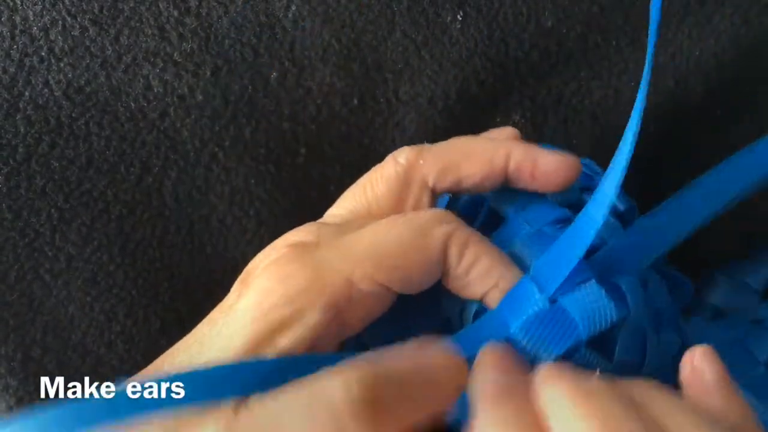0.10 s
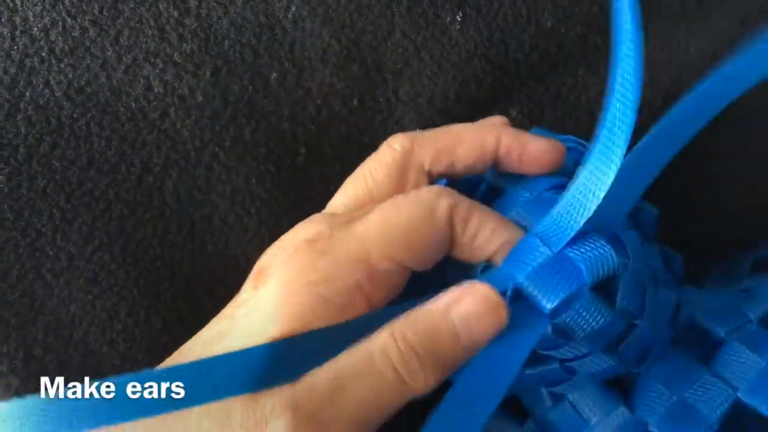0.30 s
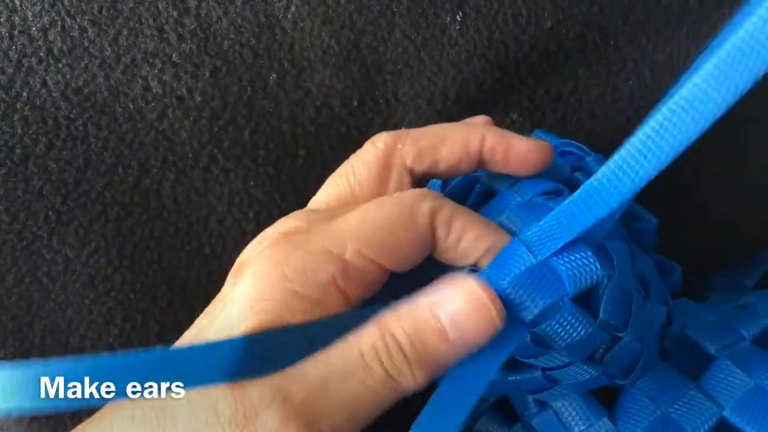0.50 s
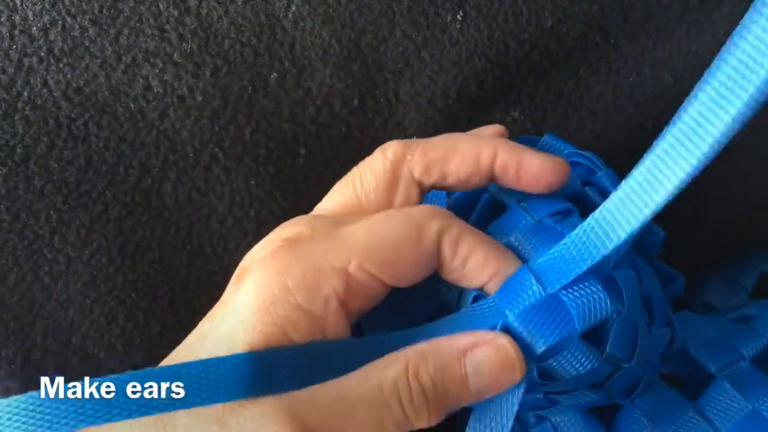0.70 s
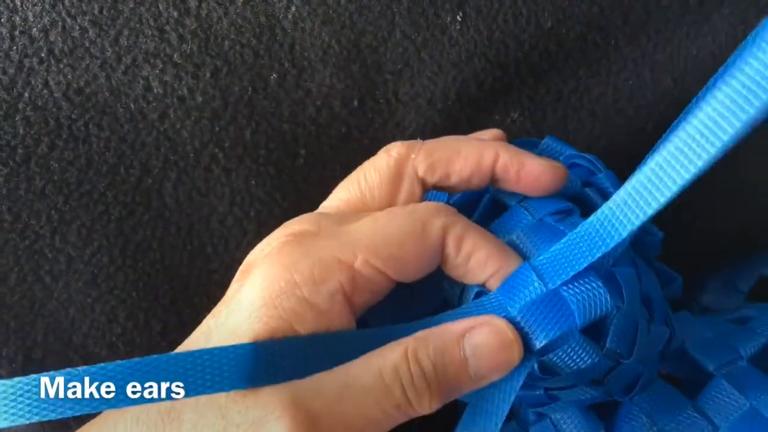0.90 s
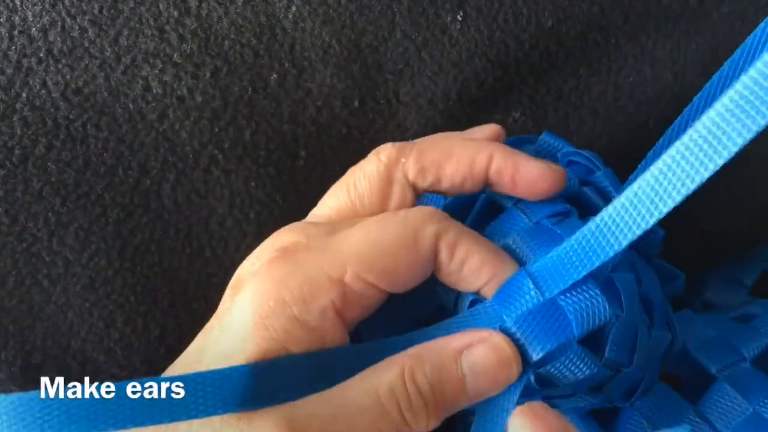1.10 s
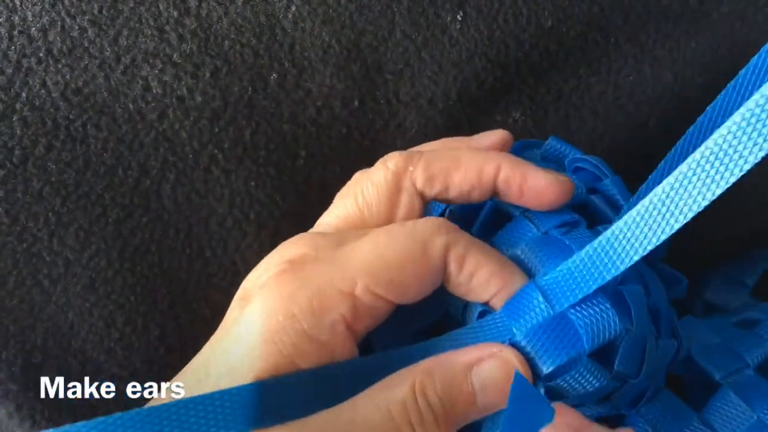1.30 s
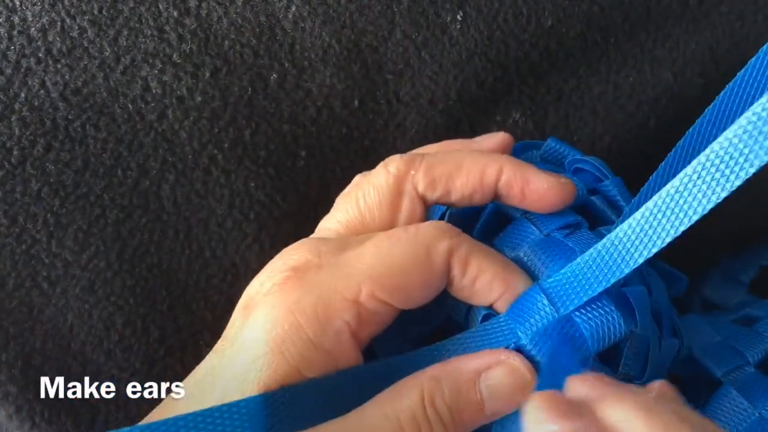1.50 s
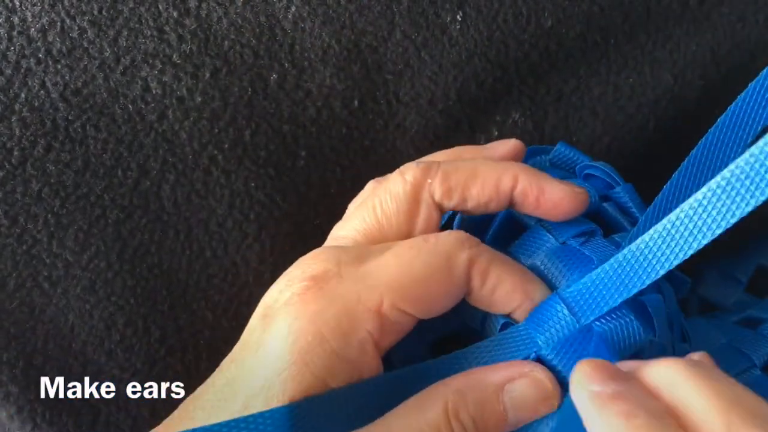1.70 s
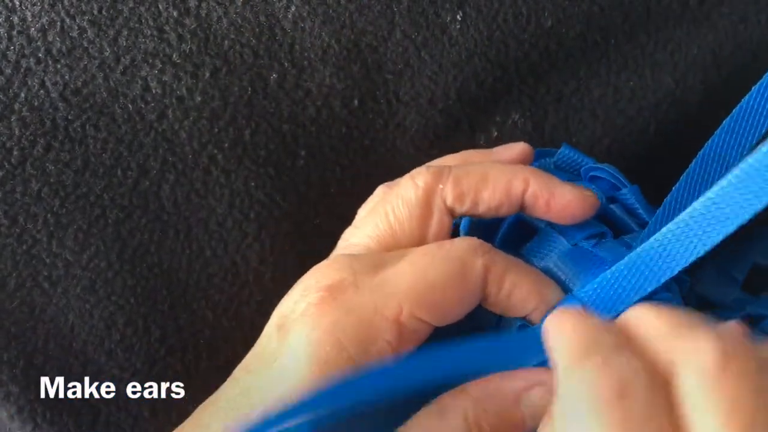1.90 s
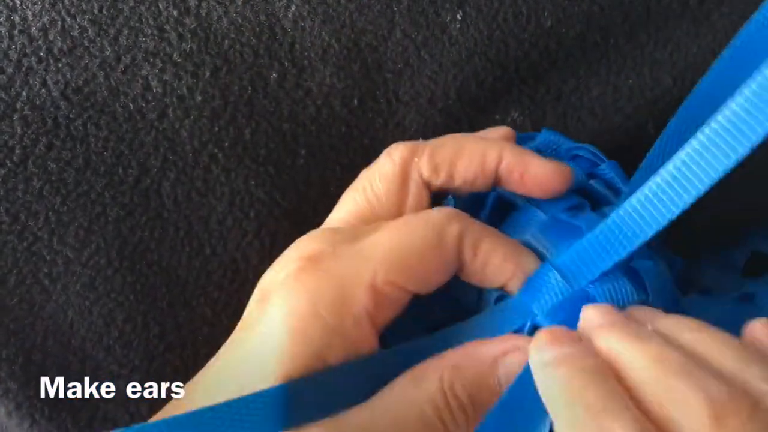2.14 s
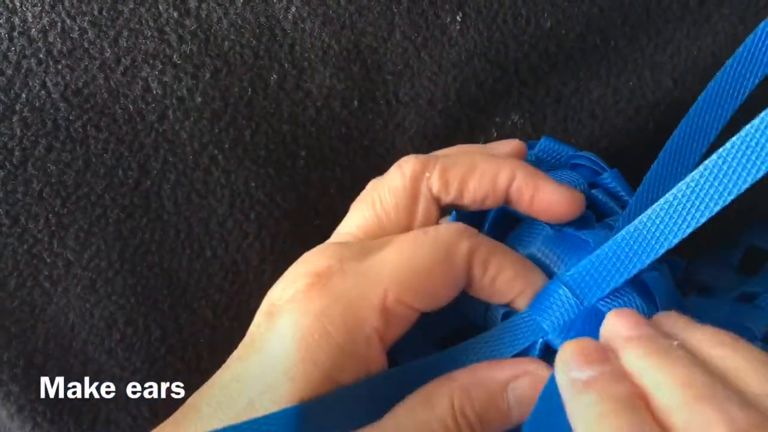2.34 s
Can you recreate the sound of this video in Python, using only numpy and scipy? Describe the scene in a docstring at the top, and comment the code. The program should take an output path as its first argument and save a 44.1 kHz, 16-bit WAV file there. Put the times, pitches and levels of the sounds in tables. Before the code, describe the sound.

A stiff ridged plastic strap is yanked through a weave with a sharp snap and rising buzzy scrape, then isolated ticks and faint crinkles thin out; close microphone in a quiet room.

```python
"""One embossed plastic strap is pulled through a weave, close to the microphone in a quiet room.
Its ridges click into the strap's resonance as a rising buzz, grit scrapes and the weave sings briefly.
Before, during and after the pull, stiff bands snap and tick: ticks in brief noise ring their modes.
Dense random crinkles make the faint rustle of fingers and bands, and low sagging tones the hand's bumps.
Behind lie a short diffuse echo of the pull and snaps, and shaped noise as room rumble and hiss."""
import sys
import numpy as np
from scipy import signal
from scipy.io import wavfile
from scipy.ndimage import uniform_filter1d

SR = 44100
rng = np.random.default_rng(int(sys.argv[2]) if len(sys.argv) > 2 else 0)


def to_linear_factor(level_db):
    """Convert decibel levels (scalar or array-like) to linear amplitude factors."""
    exponent = np.asarray(level_db, float) / 20
    return 10 ** exponent


def unload_wav(signal):
    """Save mono or channel-first audio to the path in sys.argv[1] as 16-bit WAV at rate SR, clipped to [-1, 1]."""
    wavfile.write(
        sys.argv[1],
        SR,
        np.round(np.clip(np.atleast_2d(signal).T, -1, 1) * 32767).astype(np.int16),
    )


N = 105840

# ringing modes of the stiff plastic band: pitch_hz, level_db (relative, before each snap's tilt), t60_s
BAND_MODES = [(1102, -3, 0.013), (2050, 5, 0.0027), (2730, 5.5, 0.0023), (4125, -8, 0.0069),
              (5954, -7, 0.0075), (6575, 3, 0.0023), (7816, -2, 0.0027), (9400, 2, 0.0032),
              (11770, 3, 0.0025), (13440, -2.5, 0.0072), (13440, -3, .003), (15400, -5.5, 0.0033)]


def unit_rms(x):
    """Scales to rms 1."""
    return x / np.sqrt(np.mean(x ** 2) + 1e-20)


def spectrum_db(points, hz):
    """Reads a spectrum table, interpolating on a log-frequency axis."""
    table_hz, table_db = np.transpose(points)
    return np.interp(np.log(hz + 1), np.log(table_hz + 1), table_db)


def curve(table, column):
    """One column of a time table, per sample."""
    rows = np.array(table)
    return np.interp(np.arange(N) / SR, rows[:, 0], rows[:, column])


def within(table, fade_s=0.0033):
    """1 during the span of a table, fading to 0 at its ends."""
    t = np.arange(N) / SR
    return np.clip(np.minimum(t - table[0][0], table[-1][0] - t) / fade_s, 0, 1)


def swell(start_s, length_s, sharp=0.3):
    """A rounded hump in time, per sample; a higher sharp makes it narrower."""
    u = np.clip((np.arange(N) / SR - start_s) / length_s, 0, 1)
    return np.abs(np.sin(np.pi * u)) ** sharp * (u < 1)


def coloured(x, points):
    """Causal minimum-phase filter with the given spectrum."""
    hz = abs(np.fft.fftfreq(4096, 1 / SR))
    log_gain = np.log(to_linear_factor(np.maximum(spectrum_db(points, hz), -100)))
    phase = -signal.hilbert(log_gain).imag
    taps = np.fft.ifft(np.exp(log_gain + 1j * phase)).real[:2048]
    return signal.oaconvolve(x, taps)[:N]


def resonate(x, hz, width_hz):
    """A resonance of gain 1 that follows the curve hz: shift down, smooth, shift back up."""
    turn = np.exp(2j * np.pi * np.cumsum(hz) / SR)
    r = np.exp(-np.pi * width_hz / SR)
    return 2 * (turn * signal.lfilter([1 - r], [1, -r], x / turn)).real


def grains(per_s, spread_db):
    """Dense random clicks of random size and sign, a few of them large."""
    draw = rng.random((N, 3))
    size = to_linear_factor(spread_db * np.minimum(-np.log(draw[:, 0] + 1e-9), 5))
    sign = np.sign(draw[:, 1] - .5)
    return unit_rms(size * sign * (draw[:, 2] < per_s / SR))


def pull():
    """Ridges click into the free strap amid scraping grit; band modes and the singing weave join in."""
    # course of the pull: time_s, level_db, ridge_clicks_db (re grit), strap_resonance_hz
    course = [(0.185, -69.5, -3, 1298), (0.241, -29.5, -11, 1343), (0.253, -35, -11, 1400),
              (0.305, -36, 1.5, 1540), (0.383, -32.5, -10.5, 1456), (0.427, -33, -7, 1780),
              (0.467, -36, -2.5, 1423), (0.505, -32, -10.5, 1700), (0.567, -47, -9.5, 1492),
              (0.577, -63, -9.5, 1486), (0.6, -55, -5.5, 1350)]
    # speed of the pull: time_s, ridge_rate_hz (before a slight random waver)
    speed = [(.2, 205.9), (.25, 220.1), (.283, 243.3), (.315, 266.1), (.345, 271.8), (.358, 243.8),
             (.39, 259.4), (.405, 288.5), (.425, 307.5), (.46, 306.7), (.487, 311.3), (.503, 264),
             (.524, 256.2), (.536, 378), (.56, 400.4)]
    # colour of the scrape: pitch_hz, relative_density_db (per Hz)
    scrape_tone = [(35, -57.5), (60, -19), (149, -13.5), (244, -10.5), (380, -11), (607, -0.5), (682, -5.5),
                   (991, -9.5), (1250, 0), (3500, -8.5), (6580, -10), (9570, -11), (16000, -23)]
    ridge_jitter, ridge_size_db = 0.045, 3.5  # rms, in ridge spacings and dB
    rate_waver = .012  # rms, as a share of the ridge rate
    grit_per_s, grit_spread_db = 14000, 2.2
    strap_width_hz, strap_db, streak_db = 790, -14, -1.5  # levels re the scrape

    waver = unit_rms(uniform_filter1d(rng.standard_normal(N), 600))
    turns = np.cumsum(curve(speed, 1) * (1 + rate_waver * waver)) / SR  # ridges passed so far
    slips = turns + ridge_jitter * unit_rms(uniform_filter1d(rng.standard_normal(N), 150))
    ridges = np.diff(np.floor(np.maximum.accumulate(slips)), prepend=0)
    ridges = ridges * to_linear_factor(ridge_size_db * rng.standard_normal(N))
    clicks = unit_rms(signal.lfilter([1, 0.1, -1.8, 0.48], [1], ridges))
    drive = grains(grit_per_s, grit_spread_db) + to_linear_factor(curve(course, 2)) * clicks
    scrape = unit_rms(coloured(drive, scrape_tone))
    strap = unit_rms(resonate(scrape, curve(course, 3), strap_width_hz))
    ringing = unit_rms(streaks(scrape))
    mix = unit_rms(scrape + to_linear_factor(strap_db) * strap + to_linear_factor(streak_db) * ringing)
    return within(course) * to_linear_factor(curve(course, 1)) * mix + singing(turns)


def singing(turns):
    """The weave sings briefly on multiples of the ridge rate, each note flickering in level."""
    # sung notes: start_s, length_s, multiple_of_ridge_rate, level_db (rms, before the flicker)
    notes = [(0.268, 0.051, 1, -43), (.25, 0.087, 2, -45), (0.251, 0.066, 3, -45), (0.262, 0.045, 5, -47),
             (0.315, 0.035, 4, -46), (0.318, 0.06, 6, -40.5), (0.356, 0.05, 5, -37),
             (.352, 0.047, 3, -52.5), (0.354, .035, 8, -45), (0.367, .025, 1, -53), (0.392, 0.1, 2, -44.5),
             (0.409, 0.072, 4, -40), (0.412, 0.069, 7, -40), (0.429, 0.059, 1, -49), (0.488, 0.039, 1, -47),
             (0.527, 0.032, 1, -45)]
    flicker_db = 2.5  # rms
    out = np.zeros(N)
    wobbles = uniform_filter1d(rng.standard_normal((len(notes), N // 100 + 1)), size=4)
    for (start_s, length_s, multiple, level_db), wobble in zip(notes, wobbles):
        flicker = np.interp(np.linspace(0, 1, N), np.linspace(0, 1, len(wobble)), unit_rms(wobble))
        level = to_linear_factor(level_db + flicker_db * flicker)
        tone = np.sqrt(2) * np.sin(2 * np.pi * np.round(multiple) * turns)
        out = out + level * swell(start_s, length_s) * tone
    return out


def streaks(x):
    """Rubbing stirs each mode of the band, now more, now less."""
    flicker_db, narrow = 5.0, .6  # rms flicker; scale of the mode widths
    grips = uniform_filter1d(rng.standard_normal((len(BAND_MODES), N)), size=700)
    return sum(to_linear_factor(flicker_db * unit_rms(grip)) * resonate(x, np.full(N, hz), narrow * 2.9 / t60_s)
               for (hz, _, t60_s), grip in zip(BAND_MODES, grips))


def snaps():
    """A tick, noise swelling just before it and chatter dying away after ring slightly shifted modes."""
    # snaps of band on band: time_s, level_db (before the common trim), then tilts added to the mode
    # levels: lowest_mode_db, low_modes_db, high_modes_db
    events = [(0.075, -40.5, -37, -16, -16), (0.119, -38.5, 4, 1, -8), (0.145, -35, -18, -11.5, -25.5),
              (0.163, -47, -19, -10, -38), (0.173, -51.5, -18, -10, -13), (0.199, -37.5, -23, -22, -25.5),
              (0.213, -42, 1, -13.5, -13.5), (0.223, -38, -20, -20.5, -13), (0.226, -15, -11.5, -20.5, -13),
              (0.237, -6.5, -16, -25, -20), (0.239, -10.5, -19.5, -8, -5), (0.239, -4, -16.5, -15, -11.5),
              (0.243, -12, -14.5, -21, -17), (0.357, -34, -12, -10.5, -17), (0.383, -19, -20, -45.5, -16.5),
              (0.387, -8, -46, -14, -14.5), (0.396, -7.5, -16, -13, -8.5), (0.499, -8.5, -31, -17, -14.5),
              (0.534, -14.5, -16.5, -33.5, -25.5), (0.545, -15.5, -24.5, -20, -15),
              (0.562, -22, -9, -11.5, -18), (0.568, -26, -7, -7.5, -17), (0.637, -33, -6, -7.5, -26),
              (0.683, -14.5, -40, -13, -13), (0.747, -34.5, -20, -17.5, -22), (0.776, -39, -11, -20, -21),
              (0.781, -38, -18, -23, -27.5), (0.879, -45, -23, -0.5, -22), (0.924, -46, -16.5, -15, -20),
              (0.953, -48.5, -11.5, -16, -19.5), (1.098, -32.5, -22, -19.5, -6.5),
              (1.151, -16, -29, -20.5, -22), (1.203, -47, -29, -10, 6.5), (1.212, -18, -19, -14, -15),
              (1.223, -28, -36, -42, -32.5), (1.278, -43, -30, -18, -35), (1.557, -37.5, -14.5, -21, -19),
              (1.623, -44.5, -13.5, -28, -22), (1.633, -45.5, -9.5, -26, -14.5),
              (1.649, -36, -12, -20.5, -22.5), (1.873, -45.5, -12.5, -18, -21),
              (1.919, -36.5, -13, -30.5, -18), (2.04, -37.5, -21.5, -26.5, -20),
              (2.081, -48, -17.5, -16, -14), (2.164, -24, -33.5, -20.5, -10.5), (2.176, -39, -22, -18, -12)]
    trim_db, noise_db = -4, -26  # the noise before and after is re the tick
    before_s, chatter_s, rise_s = .002, 0.0042, .00012
    before_dull, detune = .55, .035  # smoothing pole; rms share of the mode pitch
    thin = signal.butter(2, 650, "high", fs=SR, output="sos")  # Hz

    out, t, lead = np.zeros(N + SR), np.arange(2400) / SR, 500  # lead: samples ahead of the tick
    count = len(BAND_MODES)
    draws = rng.standard_normal((len(events), 2 * count + len(t)))
    since = t - lead / SR
    shape = np.exp(-np.abs(since) / np.where(since < 0, before_s, chatter_s))
    for (time_s, level_db, lowest_db, low_db, high_db), draw in zip(events, draws):
        kick = to_linear_factor(noise_db) * draw[2 * count:] * shape
        dulled = signal.lfilter([1 - before_dull], [1, -before_dull], kick)
        kick = np.where(since < 0, dulled, kick)
        kick[lead] = 1  # the tick
        tilt = [(1400, lowest_db), (1900, low_db), (3000, low_db), (4000, -12), (7500, -12.5), (9000, high_db)]
        modes = np.zeros(len(t))
        for k, (hz, mode_db, t60_s) in enumerate(BAND_MODES):
            decay = to_linear_factor(mode_db + spectrum_db(tilt, hz) - 60 * t / t60_s)
            shifted_hz = hz * (1 + detune * draw[2 * k])
            modes += decay * np.sin(2 * np.pi * shifted_hz * t) * np.sign(draw[2 * k + 1])
        modes = signal.sosfilt(thin, modes * np.minimum(t / rise_s, 1))
        ring = signal.fftconvolve(kick, modes / abs(modes).max())[:len(t)]
        at = round(time_s * SR) - lead
        out[at:at + len(t)] += to_linear_factor(level_db + trim_db) * ring
    return out[:N]


def rustle():
    """Tiny crinkles as fingers and bands scuff the weave, stirring band modes; each leans dull or bright. Two
    short, loud bursts of this noise near 0.22 s and 0.24 s are further snaps of the bands among the others
    there."""
    # scuffs: start_s, length_s, level_db (before the tilt), brightness_db (treble up, bass down); the short #
    # loud rows at 0.219 s and 0.235 s are further band snaps among the snaps there, sounded as noise bursts
    scuffs = [(0, 0.07, -67.5, -2.5), (0.045, 0.06, -65, 2), (0.09, 0.095, -58.5, -7.5),
              (0.149, 0.048, -62, -2), (0.18, 0.052, -50, -3), (.219, 0.013, -40, -1.5),
              (0.235, .012, -29, 2.75), (0.58, 0.076, -57, -2.5), (0.651, 0.08, -54.5, -3),
              (0.702, 0.084, -67, 0), (0.758, 0.051, -59.5, -8), (0.864, 0.039, -65.5, -5.5),
              (0.784, 0.084, -74, -6), (0.849, 0.15, -69, 1.5), (0.964, .11, -82.5, -9.8),
              (1.08, 0.046, -58.5, -8.3), (1.104, 0.11, -61.5, -2.3), (1.183, 0.053, -45.5, 1.8),
              (1.222, 0.072, -72.5, 5), (1.261, 0.074, -64.5, -1.5), (1.281, 0.14, -68.5, 0.7),
              (1.561, 0.064, -67.5, 0.7), (1.609, 0.038, -66, -5.5), (1.637, 0.035, -63.5, -3),
              (1.85, 0.053, -68.5, -1.6), (1.884, 0.076, -59, -5.5), (1.934, 0.13, -70.5, -1.7),
              (2.062, 0.12, -67, -1), (2.157, 0.053, -76.5, 7.5), (2.366, 0.044, -70, 1)]
    # colour of the crinkles: pitch_hz, relative_density_db (per Hz)
    tone = [(180, -30.5), (300, -6), (801, -17), (1320, -6.5), (1580, -9.5), (2440, -9.5), (3580, -14.5),
            (4090, -11.5), (12300, -10), (16000, -38)]
    crinkles_per_s, crinkle_spread_db, ring_db = 7600, 3.0, -7.5
    grain = unit_rms(coloured(grains(crinkles_per_s, crinkle_spread_db), tone))
    grain = unit_rms(grain + to_linear_factor(ring_db) * unit_rms(streaks(grain)))
    dull = signal.sosfiltfilt(signal.butter(1, 3500, fs=SR, output="sos"), grain)
    bright = grain - dull
    return sum(swell(start_s, length_s, 3.6) * to_linear_factor(level_db) * (dull * to_linear_factor(-tilt_db) + bright * to_linear_factor(tilt_db))
               for start_s, length_s, level_db, tilt_db in scuffs)


def bumps():
    """Each soft bump of the hand on the work is a short, low, slightly sagging tone."""
    # bumps: centre_s, level_db (peak), pitch_hz (at the centre), length_s
    events = [(.145, -63, 148, .03), (.23, -45, 177, 0.046), (.48, -47, 115, 0.063), (.55, -52, 81, 0.17),
              (.565, -39.5, 167, 0.017), (.64, -59.5, 76, 0.065), (1.1, -55, 194.5, 0.017),
              (1.215, -47.5, 332, 0.0073), (1.25, -58.5, 102.5, 0.084), (1.65, -60.5, 332, 0.028),
              (1.92, -54.5, 115, 0.07), (1.92, -54.5, 334, 0.027)]
    t = np.arange(N) / SR
    out = np.zeros(N)
    for centre_s, level_db, hz, length_s in events:
        since = t - centre_s
        tone = np.sin(2 * np.pi * hz * since * (1 - 1.5 * since))
        out += to_linear_factor(level_db) * swell(centre_s - length_s / 2, length_s, 1.5) * tone
    return out


def echo(x):
    """Short diffuse return from the table and hands: decaying noise after a 2 ms gap."""
    level_db, t60_s = -24.5, 0.21
    t = np.arange(4410) / SR
    tail = rng.standard_normal(len(t)) * to_linear_factor(-60 * t / t60_s) * (t > .002)
    return to_linear_factor(level_db) * signal.oaconvolve(x, tail / np.linalg.norm(tail))[:N]


def room_tone():
    """Low lumpy rumble and faint hiss: noise shaped in frequency, with slow patches of level."""
    # colour of the quiet room: pitch_hz, relative_density_db (per Hz)
    tone = [(12, -38.5), (20, 7), (177, 0.5), (347, -7.5), (1060, -17.5), (1290, -23.5), (1480, -22),
            (2140, -21.5), (2320, -21.5), (2820, -25.5), (3070, -23.5), (12400, -32), (16000, -38)]
    level_db, patch_db = -64.5, 2.5  # both rms
    frames, hz = N // 256 + 5, np.fft.rfftfreq(1024, 1 / SR)
    real, imag, patches = rng.standard_normal((frames, 513, 3)).T
    patches = uniform_filter1d(patches, 5, 0)  # across frequency
    patches = unit_rms(uniform_filter1d(patches, 8, 1))  # across time
    z = (real + 1j * imag) * to_linear_factor(spectrum_db(tone, hz)[:, None] + patch_db * patches)
    return to_linear_factor(level_db) * unit_rms(signal.istft(z, nperseg=1024, noverlap=768)[1][:N])


def scene():
    """All sources at the microphone; only the pull and snaps are echoed."""
    near = pull() + snaps()
    return (near + echo(near) + rustle() + bumps() + room_tone())[None]


def low_pass(x):
    """Removes everything above the highest recorded frequency."""
    return signal.sosfilt(signal.butter(12, 16860, fs=SR, output="sos"), x)


def record(dry):
    """The microphone's band limits: a low cut and a steep treble cut."""
    low_hz, top_hz = 52, 16500
    cut = signal.sosfilt(signal.butter(4, low_hz, "high", fs=SR, output="sos"), dry)
    cut = signal.sosfilt(signal.butter(12, top_hz, fs=SR, output="sos"), cut)
    return low_pass(cut)


dry = scene()
out = record(dry)
unload_wav(out)
```